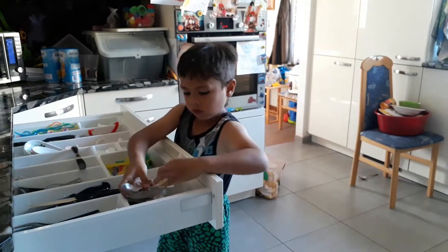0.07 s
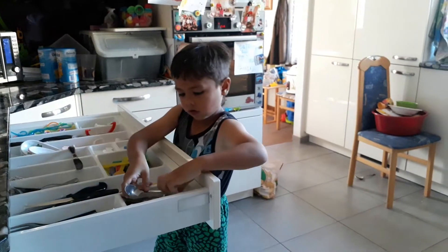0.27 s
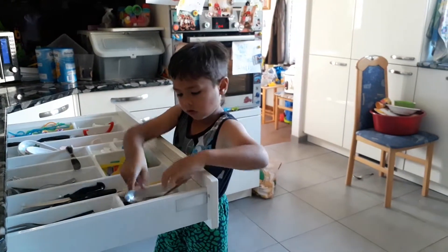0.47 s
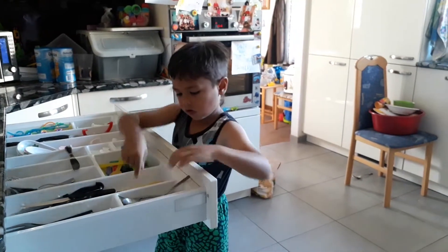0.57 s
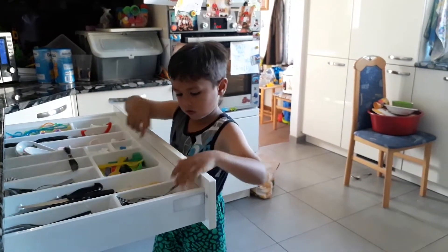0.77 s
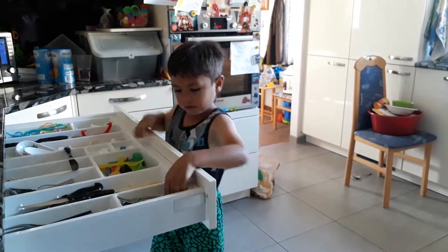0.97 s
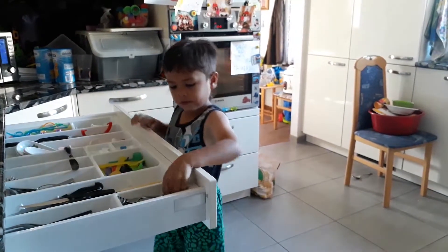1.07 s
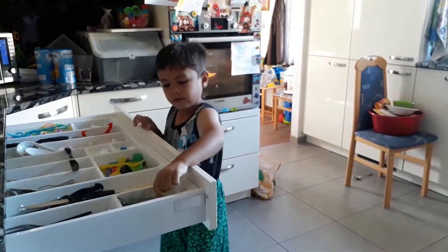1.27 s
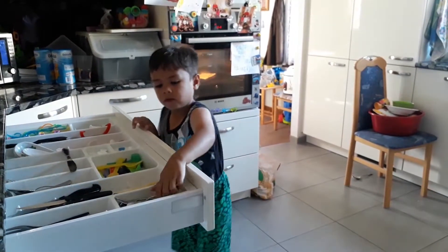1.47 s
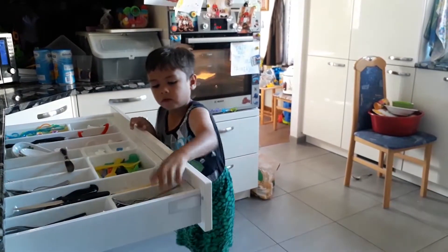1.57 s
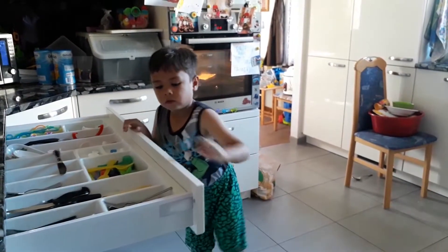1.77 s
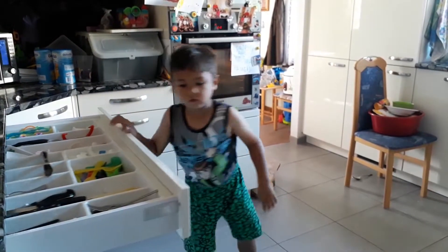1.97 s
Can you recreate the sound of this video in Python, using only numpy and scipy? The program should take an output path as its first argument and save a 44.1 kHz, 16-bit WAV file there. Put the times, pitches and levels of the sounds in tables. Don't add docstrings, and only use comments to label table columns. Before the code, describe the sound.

Metal spoons and utensils drop with bright clashes and plastic thumps into a kitchen drawer tray.

```python
import sys
import numpy as np
from scipy import signal
from scipy.fft import rfft, irfft
from scipy.io import wavfile
from scipy.ndimage import uniform_filter1d

SR = 44100
rng = np.random.default_rng(int(sys.argv[2]) if len(sys.argv) > 2 else 0)


def makeup_ratio(level_db):
    decades = np.asarray(level_db, float) / 20
    return 10 ** decades


def master_out(mix):
    frames = np.transpose(np.atleast_2d(mix))
    ceiling = np.clip(frames, -1, 1)
    pcm = np.round(ceiling * 32767).astype(np.int16)
    wavfile.write(sys.argv[1], SR, pcm)


N = 89214

# start in seconds, level in dB, chatter length in seconds.
LADLE_HITS = [
    (0.035, -18.5, 0.0034),
]
SERVER_HITS = [
    (0.119, -17, 0.006),
    (0.1514, -8.5, 0.0055),
    (0.158, -15, 0.0034),
    (0.1746, -12.5, 0.0052),
]
FORK_HITS = [
    (0.3158, -9, 0.0036),
]
SERVER_DROP_HITS = [
    (0.365, -21.5, 0.0068),
    (0.3721, -20, 0.01),
    (0.3795, -20.5, 0.0075),
    (0.398, -23.5, 0.006),
]
SPOON_HITS = [
    (.5295, -12.5, 0.0039),
    (.541, -7, 0.0021),
    (.576, -11.5, 0.0071),
]
SPOON_SETTLE_HITS = [
    (0.6606, -16.5, 0.0056),
    (0.6887, -21, 0.0078),
]
NUDGE_HITS = [
    (1.0532, -34.5, 0.0065),
    (1.0836, -54.5, 0.0066),
]
PING_HITS = [
    (1.194, -50, 0.003),
    (1.199, -46, 0.003),
]
TICK_HITS = [
    (1.235, -39, 0.0039),
]
KNIFE_HITS = [
    (1.3469, -9.5, 0.0057),
    (1.3538, -8, 0.0072),
    (1.3699, -15.5, 0.0084),
    (1.405, -18, 0.0094),
    (1.425, -15.5, 0.0055),
]
KNIFE_FALL_HITS = [
    (1.4374, -13.5, 0.0056),
    (1.4446, -8.5, 0.014),
    (1.462, -11.5, 0.0056),
    (1.4774, -10.5, 0.011),
    (1.5045, -15, 0.0049),
    (1.525, -25, 0.008),
    (1.5494, -29.5, 0.0046),
]

LADLE_HZ = [1061, 2702, 4600, 5216, 5670, 6417, 9335, 11470, 12340, 14090, 14690]
SERVER_HZ = [4657, 6336, 9189, 10610, 12350, 15620]
FORK_HZ = [9065, 10960, 12250, 14095]
SERVER_DROP_HZ = [2740, 6050, 9189, 10600, 12350]
SPOON_HZ = [2500, 4823, 6013, 9367, 10600, 11220, 14090, 14690, 15550, 9367, 14090, 1450]
SPOON_SETTLE_HZ = [2438, 2470, 5190, 6040, 7100, 10955, 14085]
NUDGE_HZ = [6300, 8829, 10800, 11350, 12700]
PING_HZ = [2650, 5300]
TICK_HZ = [2100, 3100, 5200, 9000]
KNIFE_HZ = [5030, 6080, 9375, 11230, 12390, 14090]
KNIFE_FALL_HZ = [865, 1069, 1150, 2738, 5092, 6330, 6348, 6385, 9189, 9189, 11233, 12341]

# level in dB, time to fade by 60 dB in seconds.
LADLE_RING = [(-10.5, 0.54), (-8.5, .25), (-6, .15), (-5, 0.2), (-7.5, .15), (-4.5, 0.49), (2.5, 0.3),
              (1, .15), (2.5, .25), (-1.5, .3), (-1.5, .22)]
SERVER_RING = [(-2.5, 0.074), (5, 0.12), (-10, 0.32), (-1, 0.1), (-6, .2), (-4, 0.042)]
FORK_RING = [(-16, 0.14), (-7, .18), (-4, 0.04), (-5.5, .14)]
SERVER_DROP_RING = [(0.5, .1), (-1.5, .1), (-8, .2), (-8, .12), (-7, .25)]
SPOON_RING = [(-10.5, 0.2), (2.5, 0.1), (1.5, 0.09), (4, 0.1), (3, 0.13), (-1, 0.2), (-1, 0.16),
              (-0.5, 0.12), (-1.5, .3), (-5.5, 0.27), (-3, .1), (-13, 0.24)]
SPOON_SETTLE_RING = [(-7, 0.43), (-10, 0.4), (-6, 0.09), (-6, 0.13), (13, 0.09), (7, 0.16), (-11, 0.2)]
NUDGE_RING = [(-2, .15), (-4, .15), (1.5, .2), (-6.5, 0.19), (5.5, .25)]
PING_RING = [(2.5, .04), (-4, .04)]
TICK_RING = [(-3, 0.04), (-3, .05), (-4, 0.08), (-6, .08)]
KNIFE_RING = [(-13.5, 0.22), (-1, 0.12), (-1, 0.11), (-4, 0.15), (-9, 0.07), (-10.5, 0.091)]
KNIFE_FALL_RING = [(-5, 0.48), (-4, 0.54), (-1, 0.31), (-3.5, .25), (-1, 0.4), (3.5, 0.45), (1, 0.52),
                   (-5.5, 0.24), (-4.5, 0.72), (4.5, 0.39), (-4.5, 0.17), (1.5, .15)]

SPOON_WAKES_MS = [0, 0, 0, -8, 36, 36, 34, -10, 20, 30, -10, 0]
KNIFE_WAKES_MS = [-6, 3, -2, 16, 0, 0]
KNIFE_FALL_WAKES_MS = [0, 0, 0, 0, 0, 0, 0, 0, -6, 33, 0, 60]

# frequency in Hz, level in dB per Hz.
LADLE_PILE = [(880, -54.5), (2000, -23), (3000, -12), (4600, -4), (6400, 0.5), (7800, -6.5), (12000, -1.5),
              (16000, -6.5)]
SERVER_PILE = [(880, -33), (1500, -8.5), (4290, -5), (6120, 1), (10600, 0), (16000, -3.5)]
FORK_PILE = [(1500, -2), (4500, 7.5), (7500, 3), (11000, 6.5), (15800, -1)]
SERVER_DROP_PILE = [(880, -30), (1500, 9), (3200, 0.5), (6120, 2), (12400, -2), (16000, -13.5)]
SPOON_PILE = [(1500, -30), (2400, 1), (4000, 2), (5000, 4.5), (8000, 2), (15500, 3.5)]
SPOON_SETTLE_PILE = [(880, -51.5), (1500, 3), (2020, -12), (2440, -4.5), (5120, 9.5), (16000, 7)]
NUDGE_PILE = [(880, -32), (1500, -21.5), (6370, -4.5), (9850, -9), (10800, 0), (16000, -21)]
PING_PILE = [(1500, -34.5), (3000, -12.5), (5000, -9.5), (8500, -12), (16000, -40.5)]
TICK_PILE = [(590, -44.5), (1000, -26.5), (1610, -10.5), (5130, -13.5), (16000, -44)]
KNIFE_PILE = [(300, -25), (1000, -21), (3900, -10), (5000, -1.5), (9400, 0), (15800, -4.5)]
KNIFE_FALL_PILE = [(880, -34), (1500, -4.5), (5120, -3.5), (5600, -3.5), (6180, -1), (16000, -1.5)]

# ring level in dB, clash level in dB.
PIECE_LEVELS = [(-16.5, 19), (-10.5, 19), (-18.5, 11), (-5, 20), (-12.5, 20.5), (-13, 23.5), (-15, 22),
                (-11, 24), (-5.5, 21), (-10.5, 22), (-8, 23)]

# start in seconds, level in dB, chatter length in seconds,
# treble level in dB, note of the compartment in Hz.
THUMPS = [(0.0967, -22.5, 0.0012, -13, 840), (0.119, -7.5, 0.0037, -7.5, 760),
          (0.132, -18, 0.0035, -14, 1146), (0.244, -14.5, 0.0044, -9, 565), (0.274, -20.5, 0.012, -9, 570),
          (0.31, -25, 0.006, -12, 292), (0.363, -21, 0.0031, -10, 1155), (0.374, -9, 0.0046, -12, 1150),
          (0.536, -23.5, 0.01, 5, 900), (0.58, -25, 0.0065, -4.5, 549), (0.666, -28, 0.0048, -5, 643),
          (1.056, -37.5, 0.003, -2.5, 405), (1.112, -45, 0.0036, -9, 452), (1.236, -38, 0.004, -10, 785),
          (1.354, -32, 0.0033, -10.5, 400), (1.398, -32, 0.006, -10, 440), (1.436, -11.5, 0.0045, -3, 1090),
          (1.446, -14.5, 0.0051, -12.5, 1140), (1.491, -20.5, 0.0022, -0.5, 1060),
          (1.509, -17.5, 0.0055, -3.5, 1110), (1.541, -29.5, 0.0059, -5, 1030),
          (1.641, -44.5, 0.0023, -19, 1090)]
TRAY_HZ = [290, 563, 770, 1146]
# level in dB, time to fade by 60 dB in seconds.
TRAY_RING = [(-7, 0.095), (-4, 0.12), (-16, 0.14), (-4, 0.13)]
# frequency in Hz, level in dB per Hz.
TRAY_COLOUR = [(110, -30.5), (180, -15), (1120, -4), (1460, -13.5), (5540, -4.5), (6260, -10), (12000, -22),
               (15600, -52.5), (22000, -120)]

# frequency in Hz, time to fade by 60 dB in seconds.
KITCHEN_T60 = [(150, 0.5), (500, 0.32), (2000, 0.41), (6000, 0.33), (11000, 0.33), (15000, 0.3)]

# frequency in Hz, level in dB per Hz.
AIR = [(30, -28.5), (45, -1.5), (249, -0.5), (796, -10.5), (988, -9.5), (1370, -13), (1890, -17.5),
       (8360, -31), (16000, -30.5)]
# multiple of the motor's speed, level in dB.
MOTOR = [(1, -61.5), (6, -67), (4.45, -68.5), (3.35, -64)]
# time in seconds, level in dB.
HUM_SWELL = [
    (0, 0.5),
    (.8, 2),
    (1.15, -1.5),
    (1.5, 7.5),
    (1.75, 2.5),
    (2.0, -3.5),
]
# time in seconds, level in dB.
RATTLE = [
    (1.52, -57.5),
    (1.758, -50),
    (2.0, -85),
]

MOTOR_HZ, MOTOR_WANDER, MOTOR_FLUTTER_DB = 89, 0.004, 1.2
MAINS_HZ, MAINS_DB = 100, -61
RATTLE_HZ, AIR_DB = 266, -55.5
CLICKS_PER_S, CLICK_SPREAD_DB = 6000, 2.5
RISE_S, LEAD_S = 0.003, 0.04
HELD = 0.7
RING_ROUGH_DB, RING_WET_DB, RING_DIRECT_DB = 3, -8, -3.5
JINGLE_DB, JINGLE_T60_S, JINGLE_FROM_HZ = -5, 0.025, 2000
SOFT_HZ, TRAY_RING_DB, TRAY_KNOCK_DB = 2850, -8.5, 26.5
SLOT_DB, SLOT_T60_S = 2.5, 0.052
DIRECT_DB, BUILD_S, EARLY_DB, EARLY_S = -10, 0.0025, 5.5, 0.0057
LOW_CUT_HZ, TOP_HZ = 212, 15200


def walk(rate):
    width = int(SR / rate)
    w = uniform_filter1d(rng.standard_normal(N), width)
    w = uniform_filter1d(w, width)
    return w / w.std()


def fridge():
    t = np.arange(N) / SR
    speed_hz = MOTOR_HZ * (1 + MOTOR_WANDER * walk(12))
    turn = 2 * np.pi * np.cumsum(speed_hz) / SR
    swell_db = np.interp(t, *np.array(HUM_SWELL).T)
    hum = makeup_ratio(MAINS_DB) * np.sin(2 * np.pi * MAINS_HZ * t)
    for multiple, db in MOTOR:
        level = makeup_ratio(db + MOTOR_FLUTTER_DB * walk(12) + swell_db)
        hum = hum + level * np.sin(multiple * turn)
    s, db = np.array(RATTLE).T
    buzz = makeup_ratio(np.interp(t, s, db, left=-120, right=-120)) * np.sin(2 * np.pi * RATTLE_HZ * t)
    hz, db = np.array(AIR).T
    f = np.fft.rfftfreq(N, 1 / SR) + 1
    tone = makeup_ratio(np.interp(np.log(f), np.log(hz), db))
    air = irfft(rfft(rng.standard_normal(N)) * tone, N)
    air = air / air.std() * makeup_ratio(AIR_DB + 0.51 * walk(4))
    return np.sqrt(2) * (hum + buzz) + air


def unit(x):
    return x / np.sqrt(np.sum(x ** 2))


def through(x, response):
    return signal.fftconvolve(x, response)[:N]


def chatter(s, db, length_s):
    t = np.arange(4096) / SR
    u = rng.random((3, len(t)))
    fade = np.exp(-t / max(length_s, 0.0005))
    happens = u[0] < CLICKS_PER_S / SR
    sign = np.sign(u[1] - 0.5)
    strength = makeup_ratio(-CLICK_SPREAD_DB * np.log(u[2] + 1e-9))
    clicks = happens * sign * strength * fade
    for _ in range(6):
        clicks = irfft(np.exp(1j * np.angle(rfft(clicks))))
        clicks *= fade / np.sqrt(uniform_filter1d(clicks ** 2, size=64) + 1e-12)
    out, i = np.zeros(N + len(t)), int(s * SR)
    out[i:i + len(t)] = unit(clicks) * makeup_ratio(db)
    return out[:N]


def colour(points):
    hz, db = np.array(points).T
    f = np.log(np.fft.rfftfreq(4096, 1 / SR) + 1)
    edge = -24 * np.maximum(np.log(hz[0]) - f, 0)
    c = irfft((np.interp(f, np.log(hz), db) + edge) * np.log(10) / 20)
    c[1:2048] *= 2
    c[2049:] = 0
    return unit(irfft(np.exp(rfft(c)))[:1024])


def ring(hz, shape, wakes_ms=0):
    db, t60 = np.array(shape, float).T
    t = np.arange(SR // 2)[:, None] / SR - LEAD_S - np.array(wakes_ms) / 1000
    t = np.maximum(t, 0)
    swell = (1 - np.exp(-t / RISE_S)) * np.exp(-np.log(1000) * t / (HELD * t60))
    notes = makeup_ratio(db) * swell * np.sin(2 * np.pi * np.array(hz) * t)
    return notes.sum(axis=1)


def rung(x, hz, shape, wakes_ms=0):
    lead = int(LEAD_S * SR)
    return signal.fftconvolve(x, ring(hz, shape, wakes_ms))[lead:lead + N]


def strikes(rows):
    hardest = max(rows, key=lambda row: row[1])
    out = np.zeros(N)
    out[int(hardest[0] * SR)] = makeup_ratio(hardest[1])
    return out


def jingle(hz):
    t = np.arange(SR // 20)[:, None] / SR
    hz = np.array([f for f in hz if f > JINGLE_FROM_HZ])
    notes = np.exp(-np.log(1000) * t / JINGLE_T60_S) * np.sin(2 * np.pi * hz * t)
    out = makeup_ratio(JINGLE_DB) * unit(notes.sum(axis=1))
    out[0] = 1
    return unit(out)


def kitchen():
    t = np.arange(SR) / SR
    noise = rfft(rng.standard_normal(SR))
    octave = np.log2(np.arange(SR // 2 + 1) + 1.)
    hz, t60 = np.array(KITCHEN_T60).T
    tail = 0
    for k in np.arange(6, 15):
        band = irfft(noise * np.maximum(1 - np.abs(np.maximum(octave, 6) - k), 0))
        tail = tail + band * np.exp(-np.log(1000) * t / np.interp(k, np.log2(hz), t60))
    build = 1 - np.exp(-t / BUILD_S)
    early = 1 + makeup_ratio(EARLY_DB) * np.exp(-t / EARLY_S)
    response = unit(tail * build * early)
    response[0] = makeup_ratio(DIRECT_DB)
    return response


def cutlery():
    pieces = [
        (LADLE_HITS, LADLE_HZ, LADLE_RING, LADLE_PILE),
        (SERVER_HITS, SERVER_HZ, SERVER_RING, SERVER_PILE),
        (FORK_HITS, FORK_HZ, FORK_RING, FORK_PILE),
        (SERVER_DROP_HITS, SERVER_DROP_HZ, SERVER_DROP_RING, SERVER_DROP_PILE),
        (SPOON_HITS, SPOON_HZ, SPOON_RING, SPOON_PILE, SPOON_WAKES_MS),
        (SPOON_SETTLE_HITS, SPOON_SETTLE_HZ, SPOON_SETTLE_RING, SPOON_SETTLE_PILE),
        (NUDGE_HITS, NUDGE_HZ, NUDGE_RING, NUDGE_PILE),
        (TICK_HITS, TICK_HZ, TICK_RING, TICK_PILE),
        (KNIFE_HITS, KNIFE_HZ, KNIFE_RING, KNIFE_PILE, KNIFE_WAKES_MS),
        (KNIFE_FALL_HITS, KNIFE_FALL_HZ, KNIFE_FALL_RING, KNIFE_FALL_PILE, KNIFE_FALL_WAKES_MS),
        (PING_HITS, PING_HZ, PING_RING, PING_PILE)]
    rocking = makeup_ratio(RING_ROUGH_DB * walk(90))
    out = 0
    for (rows, hz, shape, pile, *wakes), (ring_db, clash_db) in zip(pieces, PIECE_LEVELS):
        rings = makeup_ratio(ring_db) * rocking * rung(strikes(rows), hz, shape, *wakes)
        clicks = sum(chatter(*row) for row in rows)
        clash = makeup_ratio(clash_db) * through(clicks, np.convolve(colour(pile), jingle(hz)))
        in_room = through(makeup_ratio(RING_WET_DB) * rings + clash, kitchen())
        out = out + in_room + makeup_ratio(RING_DIRECT_DB) * rings
    return out


def tray():
    knock = colour(TRAY_COLOUR)
    out = 0
    for s, db, length_s, treble_db, slot_hz in THUMPS:
        blow = chatter(s, db, length_s)
        soft = signal.lfilter(*signal.butter(2, SOFT_HZ, fs=SR), blow)
        touch = soft + makeup_ratio(treble_db) * (blow - soft)
        slot = rung(strikes([(s, db)]), [slot_hz], [(SLOT_DB, SLOT_T60_S)])
        body = makeup_ratio(TRAY_RING_DB) * rung(touch, TRAY_HZ, TRAY_RING)
        body = body + makeup_ratio(TRAY_KNOCK_DB) * through(touch, knock)
        out = out + through(slot + body, kitchen())
    return out


def scene():
    hits = cutlery() + tray()
    low_cut = signal.butter(6, LOW_CUT_HZ, "high", fs=SR, output="sos")
    return (signal.sosfilt(low_cut, hits) + fridge())[None]


def band_limit(x):
    return signal.sosfilt(signal.butter(12, 17130, fs=SR, output="sos"), x)


def record(dry):
    rounded = np.tanh(dry)
    top_cut = signal.ellip(8, 0.2, 60, TOP_HZ, fs=SR, output="sos")
    return band_limit(signal.sosfilt(top_cut, rounded))


dry = scene()
out = record(dry)
master_out(out)
```